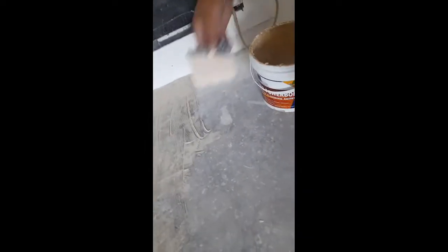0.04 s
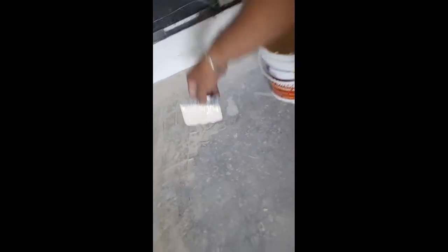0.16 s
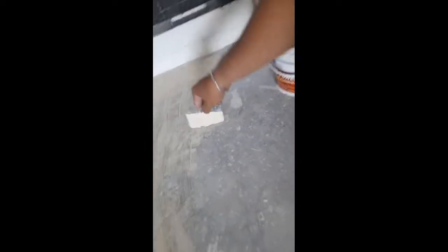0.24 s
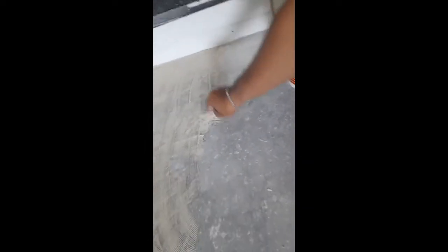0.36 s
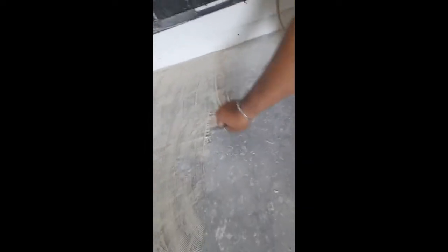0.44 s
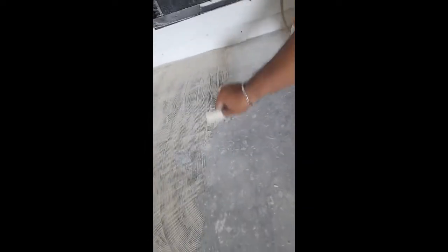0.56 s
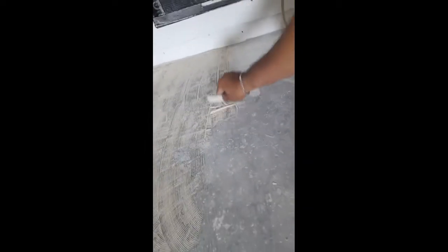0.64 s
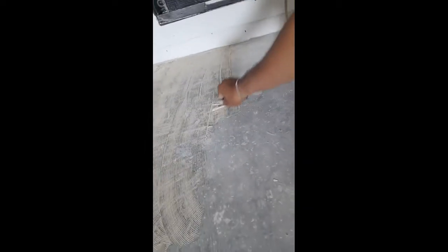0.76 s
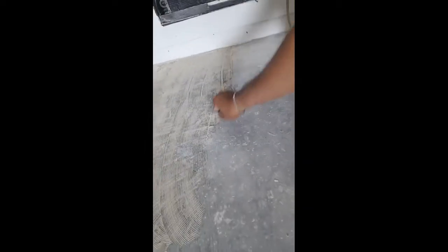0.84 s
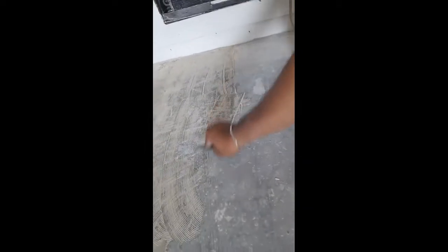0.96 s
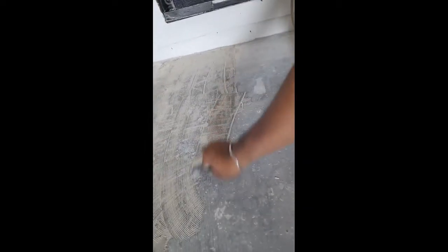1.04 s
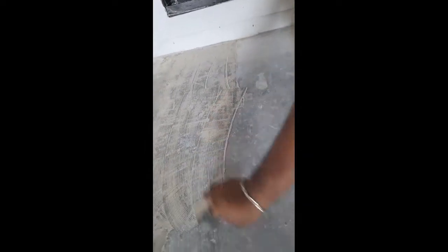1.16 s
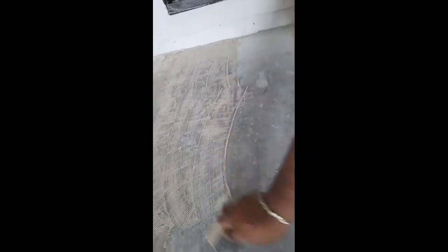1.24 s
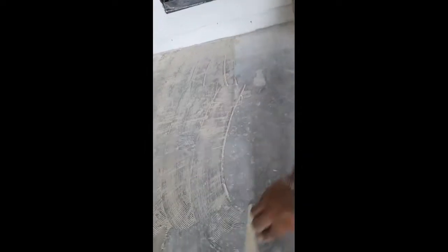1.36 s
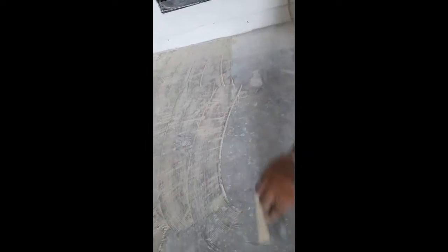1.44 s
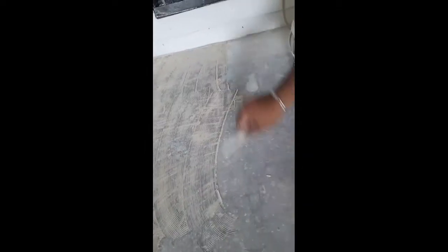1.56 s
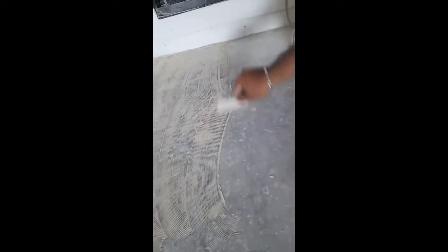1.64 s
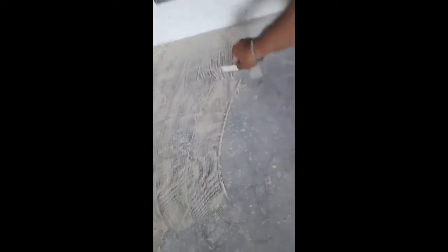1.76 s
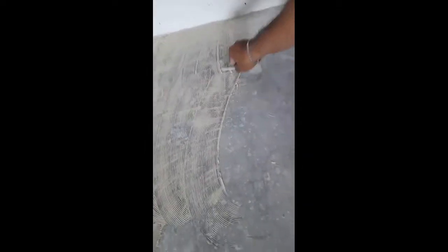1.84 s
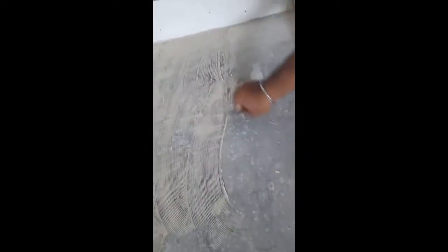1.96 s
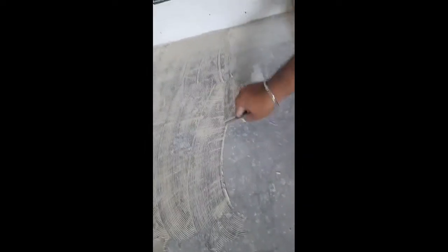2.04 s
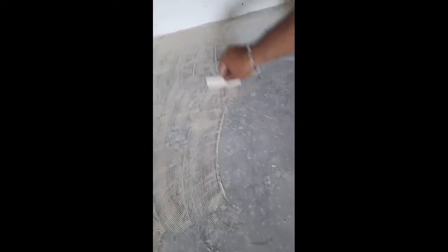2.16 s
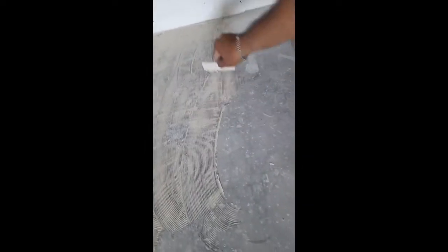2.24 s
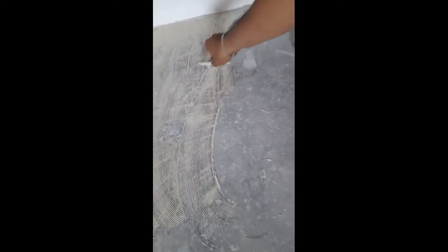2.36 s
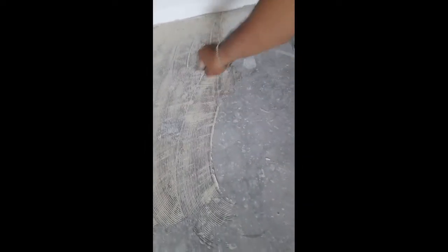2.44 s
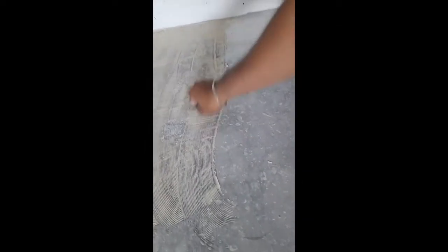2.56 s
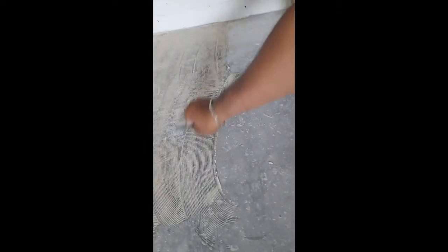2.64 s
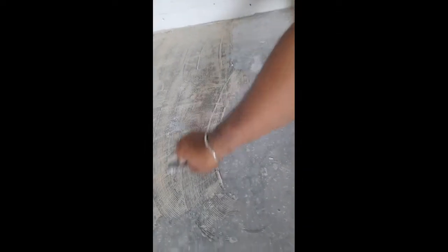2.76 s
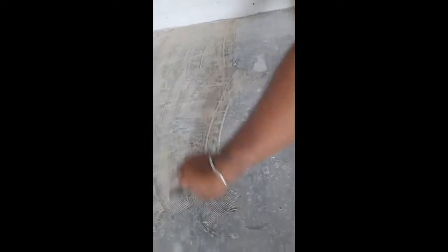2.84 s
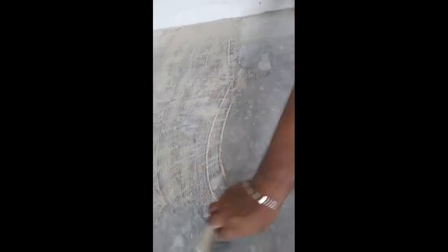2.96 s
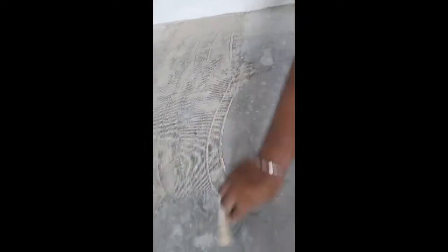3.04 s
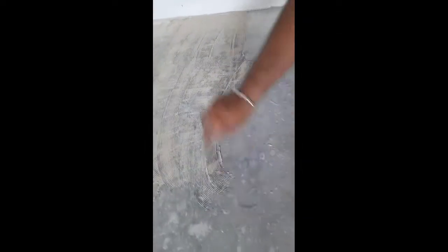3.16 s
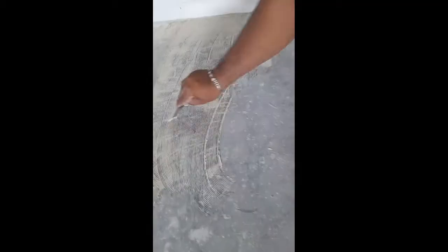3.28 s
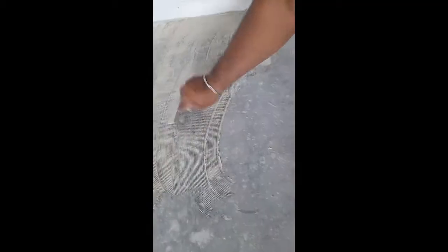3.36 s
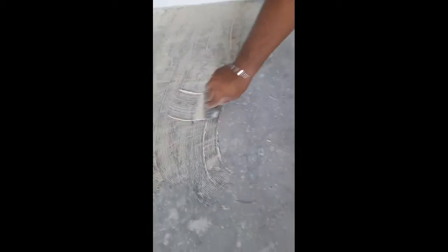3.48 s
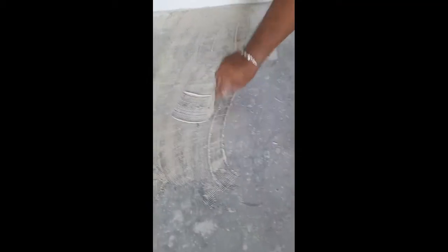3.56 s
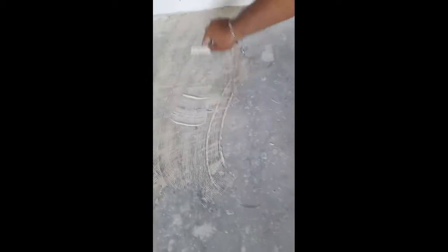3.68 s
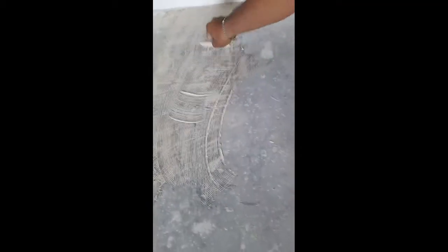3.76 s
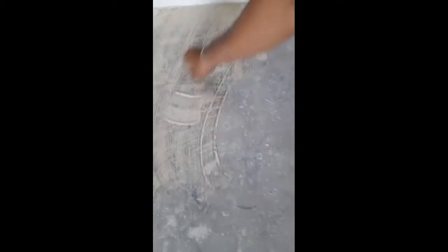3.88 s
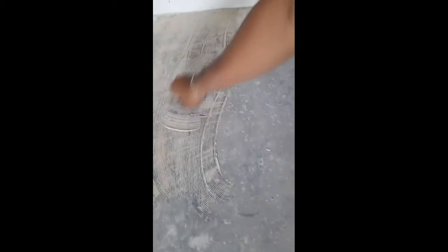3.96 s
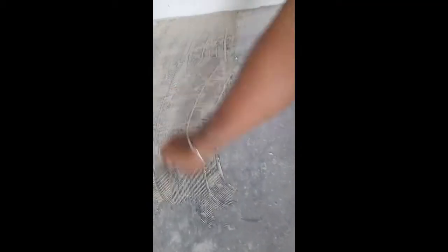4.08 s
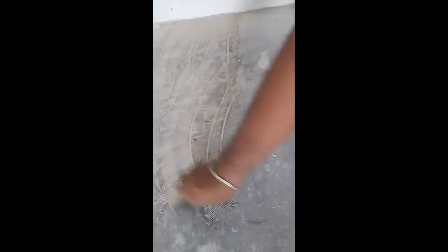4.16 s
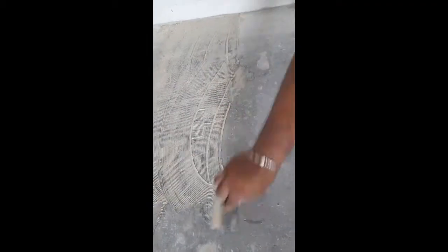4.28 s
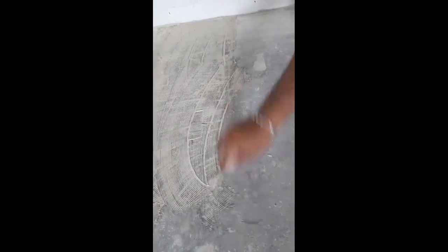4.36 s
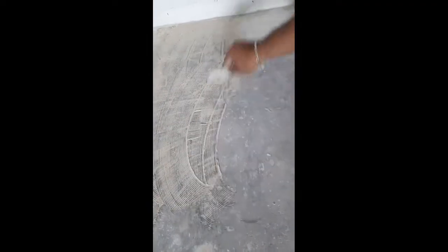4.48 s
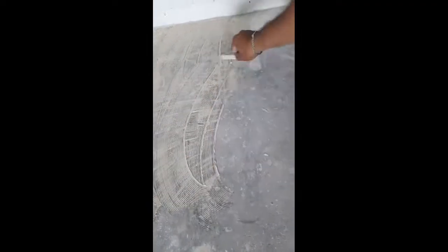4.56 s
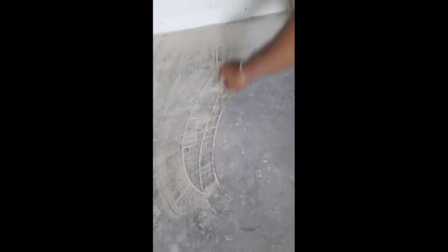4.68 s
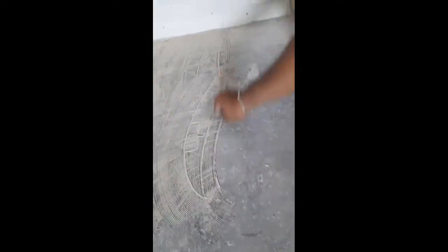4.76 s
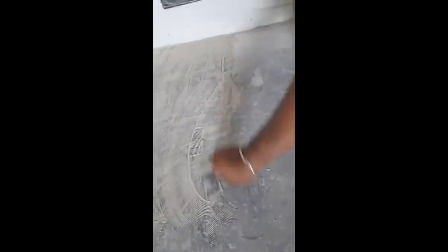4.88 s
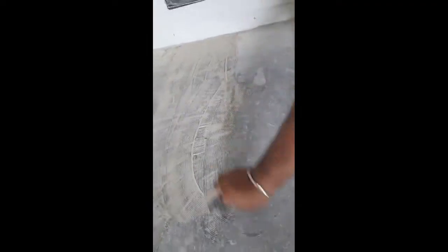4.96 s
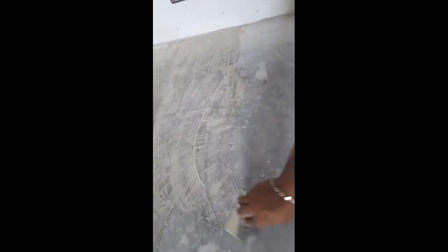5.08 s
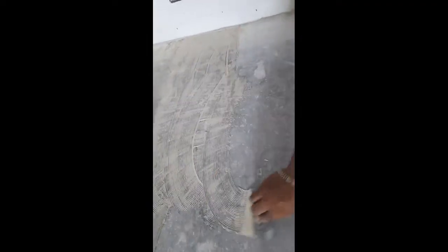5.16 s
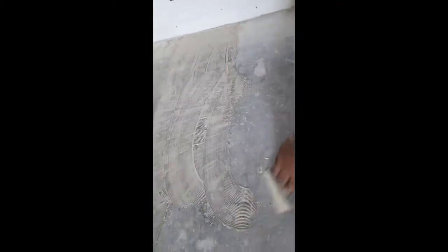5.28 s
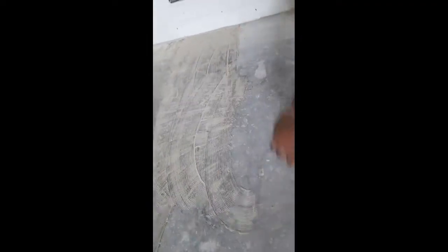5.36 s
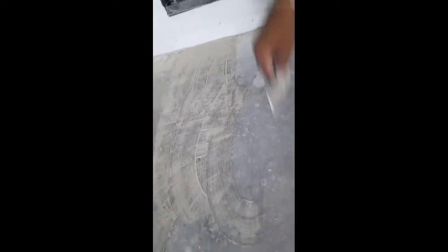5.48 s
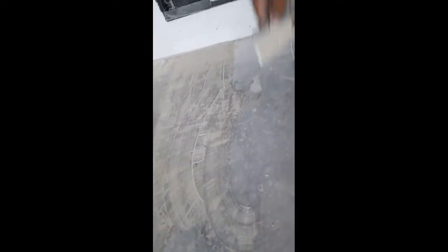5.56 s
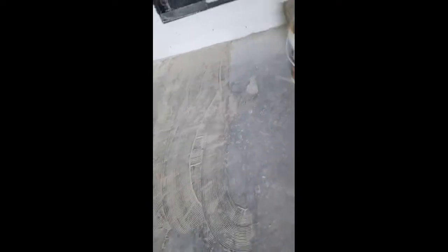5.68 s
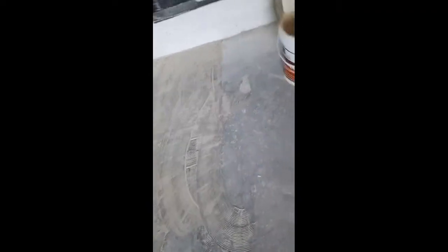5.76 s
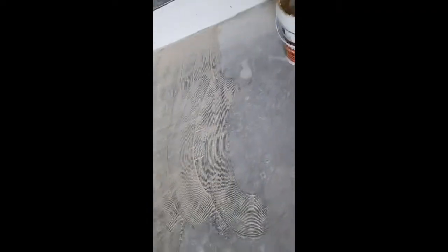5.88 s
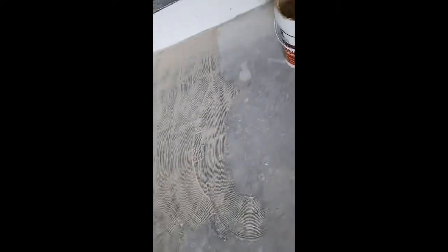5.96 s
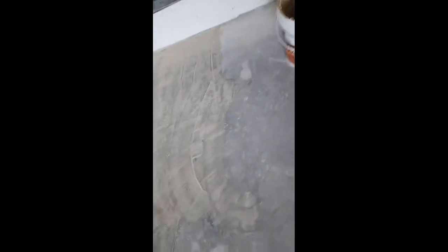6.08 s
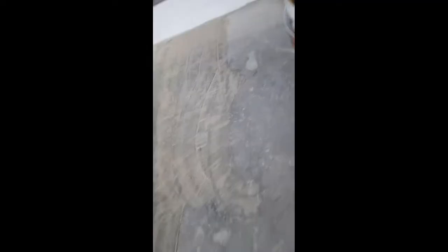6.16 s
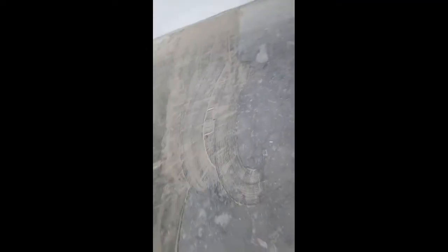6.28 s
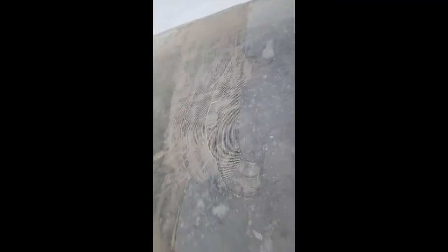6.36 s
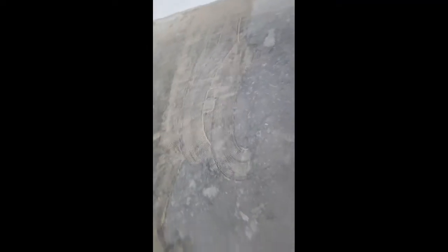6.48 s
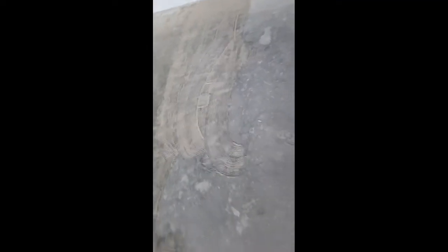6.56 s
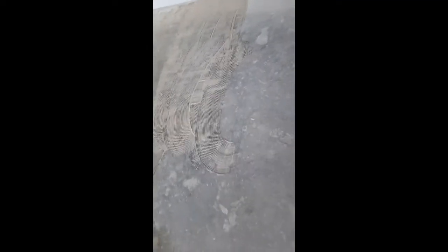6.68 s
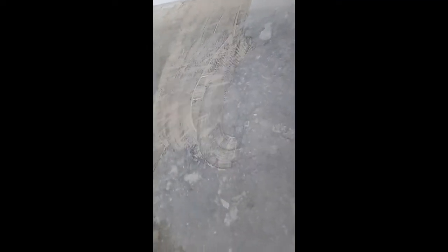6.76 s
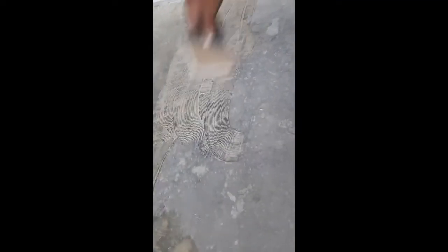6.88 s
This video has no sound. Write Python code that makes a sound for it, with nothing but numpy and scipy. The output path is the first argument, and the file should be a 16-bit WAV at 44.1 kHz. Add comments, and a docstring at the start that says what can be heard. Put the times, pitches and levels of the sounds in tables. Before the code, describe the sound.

After a handling rumble and a brief buzz, a notched blade clicks down and rasps over rough floor again and again, then rustles in a plastic bucket.

```python
"""A deep boom and sharp jolts come first, as a hand-held recorder is jostled, then a brief case buzz.
A notched spreader is tapped down and dragged through adhesive over gritty concrete in a small bare room:
clicks of grit excite the blade's resonances. At the end it rustles and is wiped inside a plastic bucket, whose
wall resonates under coarse slips and knocks. Shaped noise and a wavering hum make a low room drone underneath."""
import sys
import numpy as np
from scipy import signal
from scipy.fft import rfft, irfft
from scipy.io import wavfile
from scipy.ndimage import uniform_filter1d

SR = 44100
rng = np.random.default_rng(int(sys.argv[2]) if len(sys.argv) > 2 else 0)


def pcm_store(signal):
    """Save signal as 16-bit PCM."""
    levels = np.round(np.clip(np.atleast_2d(signal), -1, 1) * 32767)
    wavfile.write(sys.argv[1], SR, levels.astype(np.int16).T)


N = 305172
HZ = np.fft.rfftfreq(N, 1 / SR)
T = np.arange(N) / SR

# drags of the spreader, and near the end light rustles in the bucket:
#   (start [s], rise [s], hold [s], effort after the rise [dB], effort at the lift [dB], release [dB/s],
#   then against the effort: bass [dB], ring band [dB], upper rasp [dB], top treble [dB])
DRAGS = [ (0.0, 0.0048, 0.23, -48, -80, 100, 8, -3, -3.5, -3),
         (0.2, 0.076, 0.039, -45.5, -44.5, 200, 8.5, -2, -2, -1.5),
         (0.34, 0.093, 0.011, -35, -35.5, 115, 2, 5, -9, -8.5),
         (0.689, 0.067, .69, -31.5, -33, 106, -2.5, -0.5, -7.5, -7),
         (1.787, 0.077, 0.073, -25.5, -25.5, 108, -3.5, -0.5, 0, -4),
         (2.315, 0.11, 0.57, -26, -37.5, 96, -2.5, -.5, -3, -5.5),
         (3.33, 0.045, 0.16, -50, -45.5, 131, 6, -3, -2.5, -6),
         (3.761, 0.085, 0.48, -25, -38, 95.5, -4, -2.5, -3.5, -3.5),
         (4.574, 0.066, 0.27, -23, -25.5, 60.7, -5.5, -2.5, -5, -4.5),
         (5.12, 0.054, 0.13, -41, -36, 92.3, -5, 0.5, -0.5, -4.5),
         (5.495, 0.04, 0.13, -46.5, -50, 202, 3, -5.5, -7, -4),
         (5.86, 0.014, 0.19, -54, -45.5, 129, 0, -5, -4, -4),
         (6.149, 0.039, 0.044, -45, -40.5, 110, 3, -4.5, -7, -3),
         (6.365, 0.048, 0.2, -44.5, -49.5, 70, 3, -7, -2.5, 1.5),
         (6.7, 0.041, 0.013, -50, -46.5, 80, 8, -5, -4, -1.5), ]
# the teeth snag on a ridge: (time [s], swell above the drag [dB], swell of the bass [dB], 1/e half width [s])
SNAGS = [(0.845, 2.5, 4.5, 0.032), (1.0, 2, 6, 0.074), (1.185, 4, -4, .015), (1.431, 6.5, 2, 0.012),
         (2.872, 10, 8, 0.068), (3.015, 3.5, 1, 0.0082), (3.048, 10, 9.5, 0.007), (3.48, 9, 0.5, 0.028),
         (3.885, 1.5, 4, 0.036), (4.055, 2, 5.5, 0.0057), (4.21, 4.5, 3, 0.045), (4.305, 4, 5, 0.0097),
         (4.6, 5, 1, 0.0053), (4.835, 3, 0.5, 0.022), (5.305, 7, 3, 0.025)]
# blade set down on the floor: (time [s], relative level [dB], thud against the tick [dB])
TAPS = [(0.6335, -23.5, -10), (1.678, -49, 7), (1.7584, -26.5, 0), (2.2806, -23.5, -12), (3.3142, -18, -7),
        (3.7426, -16, -8.5), (4.5514, -14.5, -14), (5.8475, -29.5, -30)]
# spectrum of the gritty scrape: (frequency [Hz], relative level [dB])
GRIT_SPECTRUM = [(150, -34), (350, -21), (650, -20.5), (1090, -16), (1700, -3.5), (2170, -1.5), (3120, -2),
                 (4040, -0.5), (6900, -9.5), (8300, -20), (10000, -12.5), (15600, -21)]
# resonances of the blade: (frequency [Hz], width [Hz], relative level [dB])
BLADE_MODES = [(1080, 500, -10), (2700, 50, 5), (3850, 170, 7), (4200, 150, 7), (4600, 120, 5),
               (5950, 200, 2), (6660, 200, 2)]
# the lowest clear ring moves as the hand flexes the blade: (time [s], frequency [Hz])
FLEX = [(.72, 2290), (.86, 2630), (.95, 2184), (1.11, 2250), (1.3, 2413), (1.43, 2240), (1.82, 2310),
        (1.93, 2150), (2.06, 2340), (2.43, 2320), (2.7, 2140), (2.9, 2305), (3.85, 2300), (4.08, 2170),
        (4.25, 2510), (4.64, 2384), (4.69, 2153), (4.88, 2205), (5.3, 2340)]
# blade wiped along the bucket wall: (start [s], rise [s], hold [s], level after the rise [dB],
#   level at the lift [dB])
WIPES = [(5.957, 0.027, 0.071, -37, -34.5), (6.385, 0.016, 0.17, -32.5, -43.5)]
# resonances of the bucket wall: (frequency [Hz], width [Hz], relative level [dB])
BUCKET_MODES = [(506, 140, -7.5), (570, 40, -1), (672, 39, -11), (1400, 57, -18)]
# knocks on the bucket: (time [s], relative strength [dB])
BUCKET_KNOCKS = [(5.970, -36), (5.993, -32), (6.024, -36), (6.053, -34), (6.401, -26), (6.421, -33),
                 (6.546, -35.5)]
# the recorder is jostled: (time [s], level [dB], pitch of the boom [Hz], relative level of the rattle [dB])
JOSTLE = [(0.0, -17, 120, -12), (0.128, -15.5, 116.8, -27), (0.146, -22.5, 121.3, -2),
          (0.216, -15, 115, -2.5), (0.262, -21, 131, -3)]
# short jolts of the recorder: (time [s], level [dB], frequency [Hz])
JOLTS = [(.184, -5, 149), (0.199, 0.3, 285), (0.2188, -7, 207), (0.2416, -7.5, 210)]
# spectrum of the room drone: (frequency [Hz], relative level [dB])
DRONE_SPECTRUM = [(13, -61), (22, -17.5), (209, -1.5), (268, -12), (393, -7.5), (464, -14.5), (6840, -36.5),
                  (8280, -47), (9770, -35), (14000, -40), (15600, -88)]
# likeness of the two ports: (frequency [Hz], left-right correlation [0 to 1])
PORT_LIKENESS = [(100, 0.92), (350, 0.97), (650, 0), (1100, 0.38), (1700, 0)]
# balance of the two ports: (frequency [Hz], left minus right [dB])
PORT_BALANCE = [(300, 2.5), (1100, -1.5), (2200, 1.5), (3000, 4), (4200, 2), (6800, 7), (7800, -1.5),
                (10000, -2), (15000, -1)]
# decay of the room: (frequency [Hz], time to fall 60 dB [s])
ROOM_T60 = [(300, 0.87), (2000, 0.34), (6000, 0.35), (14000, 0.26)]

RISE_CURVE = 1.57  # exponent
LIFT_DB, LIFT_S = -4, 0.024  # the lift drops a step, then the drag dies away
WIPE_RELEASE_DB_PER_S = 110
BASS_FADE_DB_PER_S, RING_FADE_DB_PER_S = 10, 9  # the blade tips up as the arm sweeps on
BASS_LATE_DB, BASS_LATE_S = -8, 0.089  # the bass fills in as the blade gathers adhesive
FIZZ_ARCH_DB = 2.5  # the top treble is strongest in mid-sweep, where the blade is fastest
SNAG_RING = 0.83  # share of a snag's swell that reaches the ring band
FLEX_WIDTH_HZ, FLEX_DB = 100, 12
BUZZ_START_S, BUZZ_END_S, BUZZ_HZ = 0.39, 0.419, 555
DRONE_DB = -46.5
HUM_HZ, HUM_WIDTH_HZ, HUM_DB = 209.6, 6.7, -48
EDGE_HZ = 15735  # upper band limit


def spreader():
    """Forced vibration: teeth catch on grit, and the clicks drive the modes of the flexing blade."""
    levels, pressed = drag_levels()
    chatter = gain_of(0.48 * wander(0.0047) + 1.0 * wander(0.0098))  # the teeth bite in clumps
    bend = 1 + .025 * wander(.08)  # the blade's modes drift slightly at random
    touches = [(s, db) for s, db, _ in TAPS]
    settling = [(s + 0.0034, db) for s, db in touches]
    # tick, then the edge settles
    ticks = burst(touches, t60=0.018) + 0.4 * burst(settling, t60=0.084)
    under = [1 / (1 + (HZ / edge) ** 10) for edge in (1450, 1950, 2700, 2900, 4900, 7400)]
    # dips flank the ring band
    bands = [under[0], under[2] - under[1], under[4] - under[3], under[5] - under[4], 1 - under[5]]
    near, far = (grains(per_s=5000, spread_db=3.5) + 0.92 * rng.standard_normal(N) for _ in range(2))
    # as the blade moves, the delay between the ports wanders by some samples
    lag = np.round(9 * wander(.25)).astype(int)
    far = 0.58 * near[np.clip(np.arange(N) + lag, 0, N - 1)] + 0.76 * far
    sides = []
    for grit in near, far:
        scrape = evened(colour(grit, gain_of(read(GRIT_SPECTRUM, HZ))))
        flex_hz = np.interp(T, *np.transpose(FLEX))
        flexed = gain_of(FLEX_DB + 3.0 * wander(.03)) * resonate(grit, flex_hz, FLEX_WIDTH_HZ)
        modes = evened(flexed + ring(grit, BLADE_MODES, bend, sway_db=3.5))
        drive = patchy(evened(scrape + 0.58 * pressed * modes), depth_db=2.3)
        drag = sum(level * evened(colour(drive, band)) for level, band in zip(levels, bands))
        tick = evened(scrape + modes)
        sides.append(drag * chatter + .5 * ticks * tick)
    thud_level = burst([(s, db + thud_db) for s, db, thud_db in TAPS], t60=0.035)
    thuds = thud_level * evened(resonate(rng.standard_normal(N), 300, 180))
    return ports(*sides) + .5 * thuds


def drag_levels():
    """Envelopes of five bands, low to high, from each drag's own colour and time course, and the pressure."""
    snag_s, swell_db, bass_swell_db, width_s = np.transpose(SNAGS)
    bumps = np.exp(-((T - snag_s[:, None]) / width_s[:, None]) ** 2)
    snag_db, snag_bass_db = swell_db @ bumps, bass_swell_db @ bumps
    rows = np.array(DRAGS)
    bass, ring_band, upper, top = gain_of(rows[:, 6:]).T
    drags = np.array([stroke(*row[:6]) for row in rows])
    since = np.clip(T - rows[:, :1], 0, rows[:, 1:2] + rows[:, 2:3])  # seconds into each drag
    effort = drags.sum(axis=0) * gain_of(snag_db)
    effort_db = 20 * np.log10(effort + 1e-6)
    bass_db = BASS_LATE_DB * np.exp(-since / BASS_LATE_S) - BASS_FADE_DB_PER_S * since
    body = bass @ (drags * gain_of(bass_db)) * gain_of(snag_bass_db)
    ringing = ring_band @ (drags * gain_of(-RING_FADE_DB_PER_S * since)) * gain_of(SNAG_RING * snag_db)
    rasp = upper @ drags * gain_of(snag_db)
    arch_db = FIZZ_ARCH_DB * np.sin(np.pi * since / since.max(axis=1, keepdims=True))
    fizz = top @ (drags * gain_of(arch_db)) * gain_of(snag_db)
    pressed = np.clip((effort_db + 47.5) / 18, 0, 1)  # a light touch hardly rings the blade
    return [body, ringing, effort * gain_of(-3), rasp, fizz], pressed


def stroke(start, rise, hold, top_db, end_db, release):
    """Friction envelope of one sweep: rise, sloping hold, lift, exponential release."""
    t = T - start
    after = np.maximum(t - rise - hold, 0)
    held_db = top_db + (end_db - top_db) * np.clip((t - rise) / hold, 0, 1)
    swell = np.sin(np.pi / 2 * np.clip(t / rise, 0, 1)) ** RISE_CURVE
    return swell * gain_of(held_db + LIFT_DB * np.minimum(after / LIFT_S, 1) - release * after)


def patchy(x, depth_db):
    """Random modulation: patches of stronger and weaker colour over time and pitch."""
    z = signal.stft(x, nperseg=256)[2]
    field = rng.standard_normal(z.shape[::-1]).T
    field = uniform_filter1d(field, size=3, axis=0)  # across pitch
    field = evened(uniform_filter1d(field, size=16, axis=1))  # across time
    return signal.istft(z * gain_of(depth_db * field), nperseg=256)[1][:N]


def bucket():
    """Modal excitation: coarse slips and knocks set the hollow plastic wall resonating."""
    level = sum(stroke(*w, WIPE_RELEASE_DB_PER_S) for w in WIPES)
    slips = [grains(per_s=220, spread_db=0.0) + 1.3 * rng.standard_normal(N) for _ in range(2)]
    wall = ports(*(evened(ring(x, BUCKET_MODES)) * level for x in slips))
    blow = burst(BUCKET_KNOCKS, t60=0.001)
    return wall + 57.0 * ring(blow, BUCKET_MODES)


def handling():
    """Structure-borne sound: a lumpy boom and jolts alike in both ports, then the case buzz."""
    s, *columns = np.transpose(JOSTLE)
    level_db, hz, rattle_db = (np.interp(T, s, c) for c in columns)
    held = np.clip((s[-1] - T) / 0.0006, 0, 1)
    spin = 2 * np.pi * np.cumsum(hz) / SR
    harmonics = np.sin(spin) + 0.022 * np.sin(3 * spin) + 0.019 * np.sin(5 * spin)
    boom = np.sqrt(2) * harmonics * gain_of(2.5 * wander(0.0069))
    noise = rng.standard_normal((2, N))
    rattle = evened(resonate(resonate(noise[0], 275, 190), 275, 190)) * gain_of(rattle_db - 7.0)
    sub = evened(resonate(resonate(noise[1], 52, 40), 54, 40)) * gain_of(-1.5)
    jolts = np.zeros(N)
    for at, db, f in JOLTS:
        pulse = np.exp(-((T - at) * f / 0.59) ** 2)
        jolts -= gain_of(db) * np.cos(2 * np.pi * f * (T - at)) * pulse
    shaken = (boom + rattle + sub) * gain_of(level_db) + jolts
    leak = signal.butter(2, 55, "high", fs=SR, output="sos")  # the port leaks the deepest bass
    return signal.sosfilt(leak, shaken) * held + case_buzz()


def case_buzz():
    """Inharmonic partials: a short tone whose main partial is about a quarter cycle apart in the ports."""
    gate = np.clip(np.minimum((T - BUZZ_START_S) / .004, (BUZZ_END_S - T) / .0015), 0, 1)
    turns = 2 * np.pi * BUZZ_HZ * T
    main = np.sin(turns + np.array([[0], [1.7]]))  # phase in each port [rad]
    partials = 0.086 * np.sin(2 * turns) + 0.18 * np.sin(turns / 2.315) + 0.09 * np.sin(2.27 * turns)
    level_db = -11.5 + 2.3 * wander(0.00061) + np.array([[-2.0], [2.0]])
    return (main + partials) * gain_of(level_db) * gate


def drone():
    """Filtered noise: a steady wash and a fuzzy narrow-band hum share slight random swells."""
    noise = rng.standard_normal((3, N))
    wash = [evened(colour(x, gain_of(read(DRONE_SPECTRUM, HZ)))) for x in noise[:2]]
    hum = gain_of(HUM_DB) * evened(resonate(noise[2], HUM_HZ, HUM_WIDTH_HZ))
    return (ports(*wash) * gain_of(DRONE_DB) + hum) * gain_of(0.24 * wander(0.044))


def room(x):
    """Reverberation: sparse echoes of random sign, each band dying at its own speed."""
    taps = np.zeros((2, SR // 2))
    at = np.arange(200, SR // 2 - 20, 20)
    at = at + rng.integers(0, 20, (2, len(at)))
    np.put_along_axis(taps, at, rng.choice([-1., 1.], at.shape), 1)
    hz, t, z = signal.stft(taps, SR, nperseg=256)
    decay = gain_of(-60 * t / read(ROOM_T60, hz)[:, None])
    tail = signal.istft(z * decay, SR, nperseg=256)[1]
    return signal.fftconvolve(x, tail / np.linalg.norm(tail[0]), axes=1)[:, :N]


def ports(a, b):
    """Spatial coherence: two microphone ports share part of each band and differ in the rest."""
    same = np.clip(read(PORT_LIKENESS, HZ), -1, 1)
    tilt = gain_of(read(PORT_BALANCE, HZ) / 2)
    left = colour(a, tilt)
    right = colour(a, same / tilt) + colour(b, np.sqrt(1 - same ** 2) / tilt)
    return np.array([left, right])


def ring(x, modes, bend=1, sway_db=0):
    """Modal superposition: the resonances of one object add; each may swell and fade on its own."""
    total = 0
    for k, (hz, width_hz, db) in enumerate(modes):
        sway = sway_db * wander(0.035) if sway_db else 0
        total = total + (-1) ** k * gain_of(db + sway) * resonate(x, hz * bend, width_hz)
    return total


def resonate(x, hz, width_hz):
    """Heterodyne resonance: shifts hz down to zero, smooths, and shifts back; the peak gain is about 1."""
    turn = np.exp(2j * np.pi * np.cumsum(hz * np.ones(N)) / SR)
    r = np.exp(-np.pi * abs(width_hz) / SR)
    smooth = signal.lfilter([1 - r], [1, -r], x / turn + 1e-18)
    return 2 * (turn * smooth).real


def grains(per_s, spread_db):
    """Impulsive excitation: sparse clicks of random sign and, with a spread, a few large ones."""
    chance, side = rng.random((2, N))
    size = np.minimum(rng.exponential(1, N), 5)
    return evened((chance < per_s / SR) * np.sign(side - .5) * gain_of(spread_db * size))


def burst(events, t60):
    """Exponential decay: an envelope that jumps at each (time [s], level [dB]) and dies away."""
    return sum(gain_of(db - 60 * np.maximum(T - s, 0) / t60) * (T >= s) for s, db in events)


def wander(seconds):
    """Smoothed noise: a random drift of rms 1."""
    size = max(int(seconds * SR), 2)
    return evened(uniform_filter1d(uniform_filter1d(rng.standard_normal(N), size), size))


def colour(x, gain):
    """Linear filtering: applies a gain to each frequency."""
    return irfft(rfft(x) * gain, N)


def read(points, hz):
    """Interpolation: reads a table on a log-frequency axis."""
    f, value = np.transpose(points)
    return np.interp(np.log(hz + 1), np.log(f + 1), value)


def evened(x):
    """Normalisation: scales to rms 1."""
    return x / np.sqrt(np.mean(x ** 2) + 1e-20)


def gain_of(db):
    """Logarithmic level: decibels to amplitude gain."""
    return 10 ** (np.asarray(db) / 20)


def scene():
    """Superposition: all sources add; the tool and bucket also sound through the room."""
    work = spreader() + bucket()
    return work + gain_of(-9) * room(work) + handling() + drone()


def record(dry):
    """Overload and band limit: the input clips the hardest jolt, then a low-pass removes the top."""
    low_pass = signal.firwin(511, EDGE_HZ, window=("kaiser", 9), fs=SR)
    return signal.oaconvolve(np.clip(dry, -.97, .97), low_pass[None], "same")


dry = scene()
out = record(dry)
pcm_store(out)
```